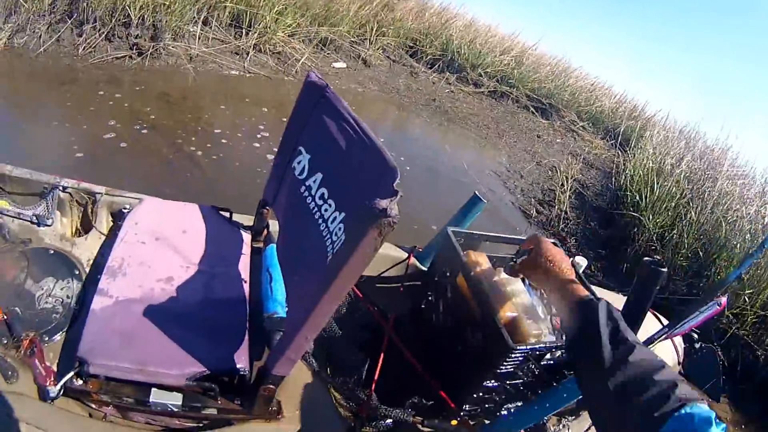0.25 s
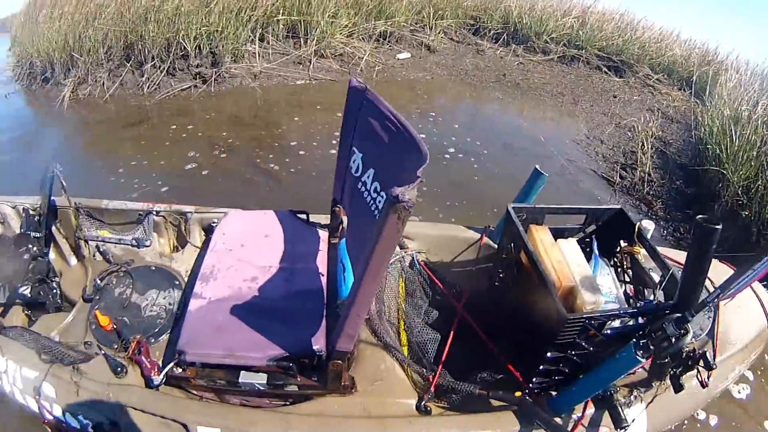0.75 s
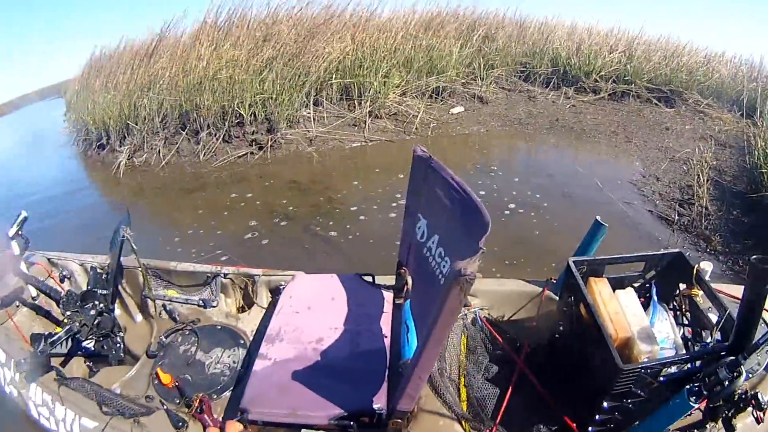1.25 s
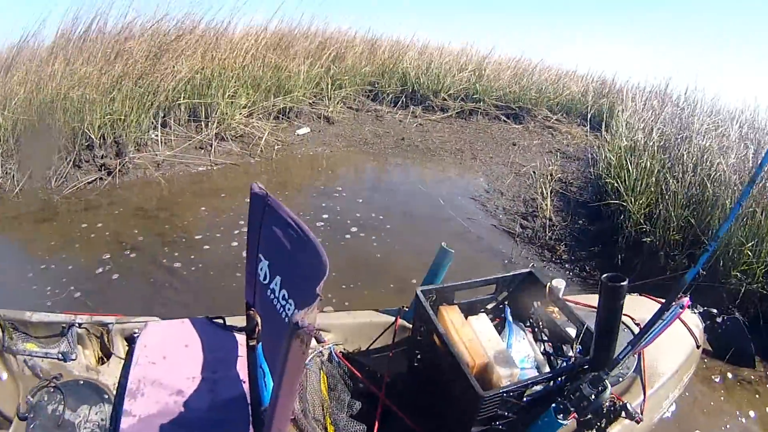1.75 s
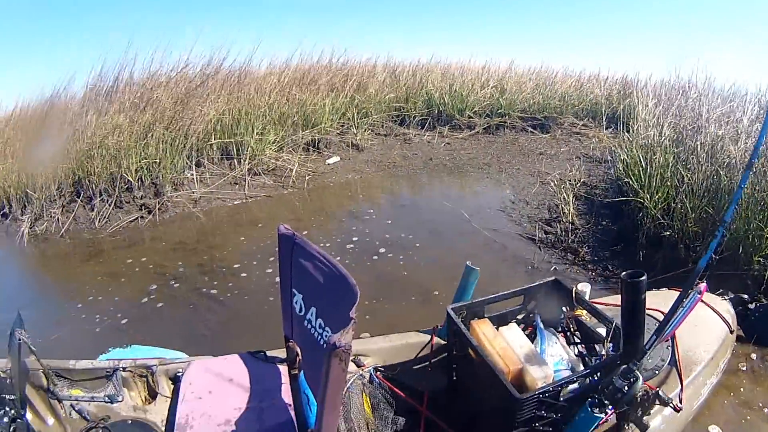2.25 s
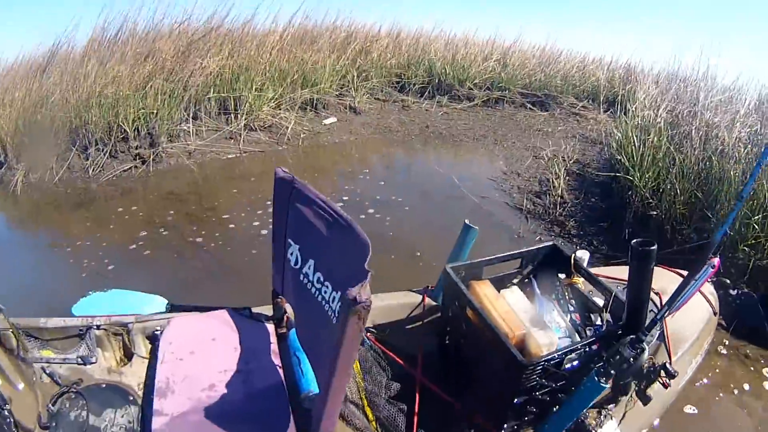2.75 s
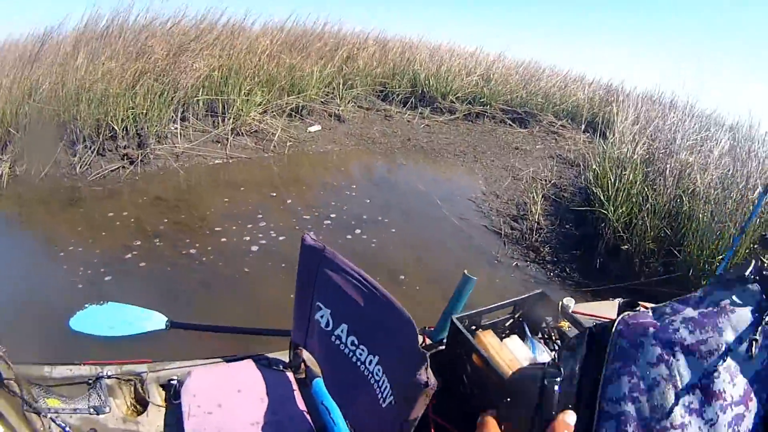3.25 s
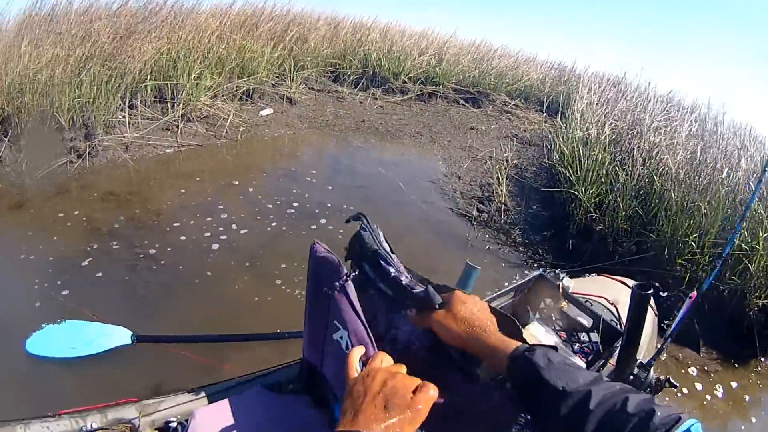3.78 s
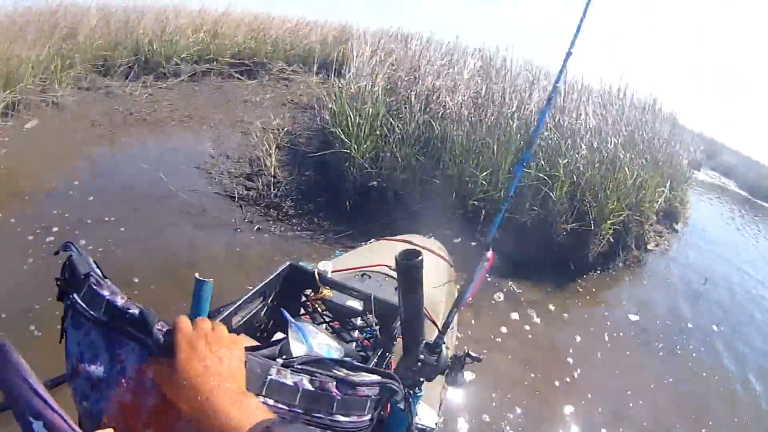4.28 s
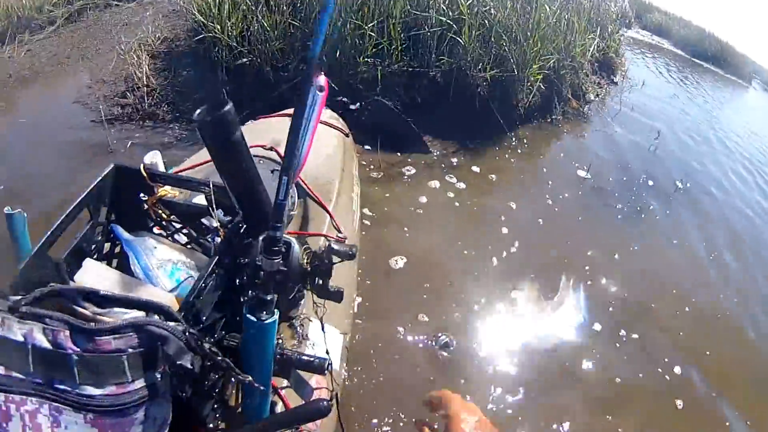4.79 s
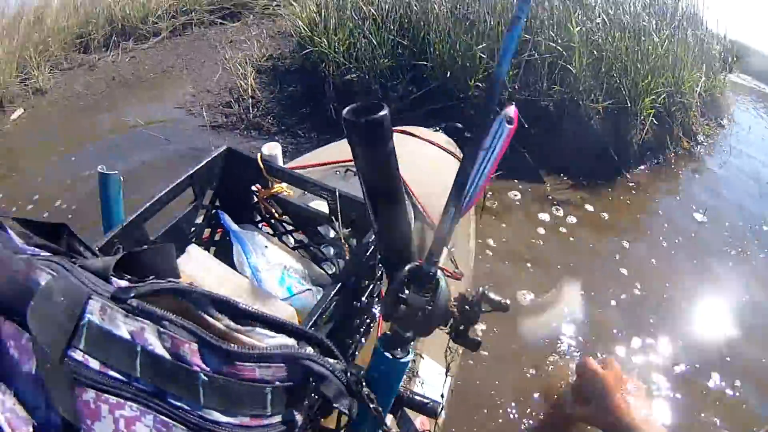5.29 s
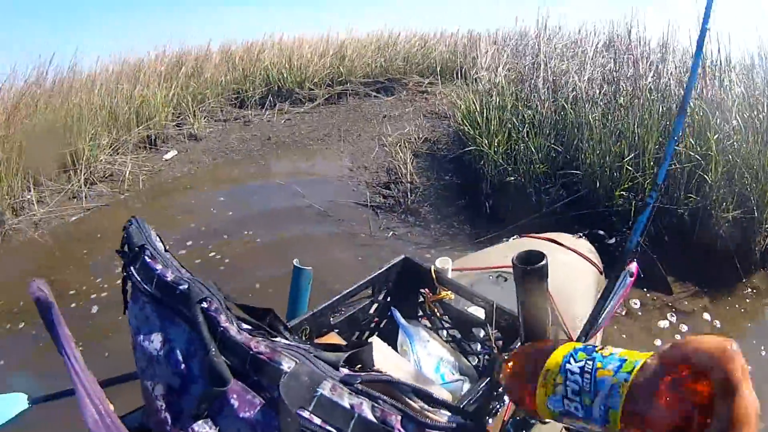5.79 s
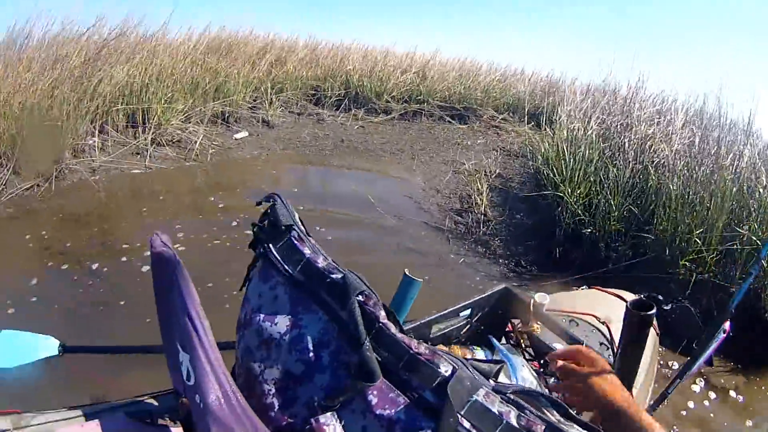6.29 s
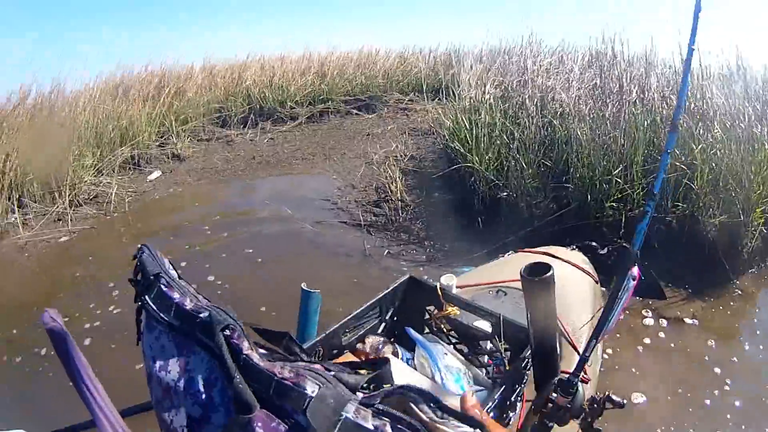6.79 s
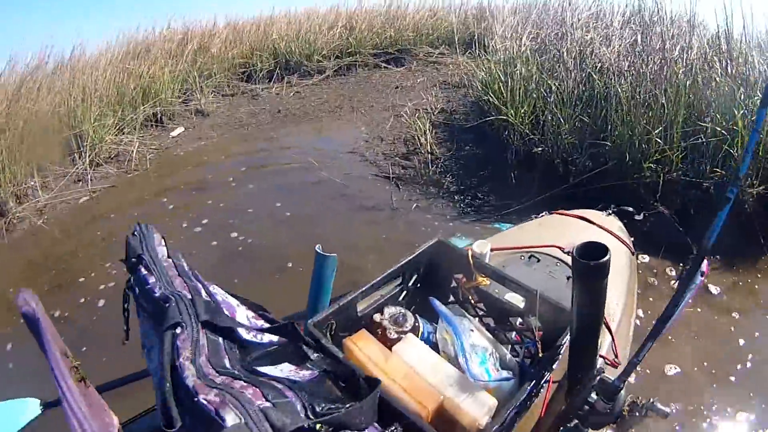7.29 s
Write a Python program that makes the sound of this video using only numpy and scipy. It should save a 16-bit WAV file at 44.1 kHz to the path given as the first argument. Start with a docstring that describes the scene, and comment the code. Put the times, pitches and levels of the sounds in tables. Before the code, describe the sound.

Hollow hull knocks, tackle clatter, nylon bag rubs and small clicks on a kayak in a quiet marsh, with faint water dribbles and low wind buffeting.

```python
"""Gear knocks and thumps on the plastic hull of a kayak at the edge of a marsh creek: damped panel and
hull modes under a low deck boom. A tackle tray rattles as random contacts, hard parts click and chink,
cloth and bag rub as filtered grains, and a seat frame creaks in jerks. Stirred shallow water is made of
gliding bubble tones and spray; filtered noise gives wind buffeting on the microphone and faint air.
A camera housing colours the whole mix."""
import sys
import numpy as np
from scipy import signal
from scipy.fft import rfft, irfft, next_fast_len
from scipy.io import wavfile
from scipy.ndimage import uniform_filter1d

SR = 44100
rng = np.random.default_rng(int(sys.argv[2]) if len(sys.argv) > 2 else 0)


def wav_out(sig):
    """Save sig, one row per channel (or a flat mono array), as 16-bit PCM at SR to the path in sys.argv[1]."""
    wavfile.write(sys.argv[1], SR, np.round(np.clip(np.atleast_2d(sig).T, -1, 1) * 32767).astype(np.int16))


N = 332469
TIME = np.arange(N) / SR
RING = np.arange(SR // 2) / SR  # time axis of a single struck sound

# gusts on the microphone, before the wind trims: crest t/s, half-width/s, level/dB, flutter relative level/dB
GUSTS = [(.52, 0.066, -33, -13), (0.962, 0.14, -35, -4.5), (1.211, 0.041, -44, 7.5),
         (1.42, 0.058, -39.5, 5), (1.75, 0.13, -37.5, -4), (2.29, 0.12, -36.5, 4.5),
         (2.83, 0.087, -33.5, 0.5), (3.3, .27, -33.5, 0), (3.74, 0.066, -32, 0.5), (4.27, 0.094, -39, -9),
         (4.54, 0.15, -42.5, 8.5), (5.105, 0.02, -27, -8), (5.25, 0.043, -39.5, -8),
         (5.43, 0.12, -41.5, 1.5), (6.24, 0.033, -37, 2), (6.65, 0.027, -29, -12), (6.95, 0.07, -37, 0),
         (7.17, 0.043, -36.5, -2), (7.43, 0.091, -32, 4)]
# breeze between the gusts, before the wind trims: t/s, level/dB
BREEZE = [(0, -46.5), (.7, -50.5), (1.1, -45), (2.5, -43.5), (4.0, -44), (4.82, -51), (5.05, -42.5),
          (5.85, -47.5), (6.15, -51.5), (6.5, -44), (7.54, -38.5)]
# spectrum of the wind rumble: f/Hz, level/dB
RUMBLE_COLOUR = [(10, -5), (25, -1), (55, -1), (85, -4), (130, -10), (250, -34.5), (2000, -100)]
# spectrum of the wind flutter: f/Hz, level/dB
FLUTTER_COLOUR = [(60, -1.5), (110, 1.5), (180, -2.5), (280, -11), (420, -26), (900, -43), (2500, -60),
                  (8000, -100)]
RUMBLE_TRIM_DB, FLUTTER_TRIM_DB = 2, -3

# spectrum of the faint marsh hiss: f/Hz, level/dB
AIR_COLOUR = [(150, -16.5), (300, -3), (500, -7), (1500, -12), (4800, -22.5), (7000, -22.5), (13500, -29),
              (15000, -51)]
AIR_DB = -58

# strokes of cloth and bag, before the cloth trims: t/s, length/s, scuff level/dB, hiss level/dB
RUBS = [(0, 0.18, -51, -47), (0.735, 0.11, -53.5, -57), (1.61, 0.29, -59.5, -84),
        (3.408, 0.16, -61.5, -51.5), (3.629, 0.037, -46.5, -50), (3.675, 0.094, -34, -40.5),
        (3.794, .19, -39, -46.5), (3.953, 0.33, -46, -51), (4.331, 0.055, -40.5, -39),
        (4.42, 0.19, -51, -56.5), (4.858, 0.11, -51.5, -72), (4.978, 0.41, -62, -58.5),
        (6.213, 0.22, -47.5, -50.5), (6.393, 0.084, -36.5, -47), (6.494, 0.19, -55, -59),
        (6.977, .1, -48.5, -51), (7.088, 0.06, -41, -61), (7.202, 0.47, -50.5, -59.5)]
# spectrum of the dull scuff: f/Hz, level/dB
SCUFF_COLOUR = [(90, -39), (200, 4.5), (460, 4), (800, -4.5), (1300, -8), (3000, -22), (6000, -80)]
# spectrum of the crisp weave hiss: f/Hz, level/dB
HISS_COLOUR = [(1200, -1), (2200, 8), (4500, 6), (8000, 4), (13800, -1), (15200, -16)]
RUB_ATTACK_S, RUB_RELEASE_T60_S = 0.027, 0.2
# the load nudges the wall as it slides; BUMP_DB is relative to the scuff envelope
BUMPS_PER_S, BUMP_SPREAD_DB, BUMP_HZ, BUMP_DB = 70, 3.5, 545, -6.5

# light chinks of small hard parts: t/s, level/dB, contact length/s
CHINKS = [(0.091, -56, 0.011), (1.431, -36, 0.0023), (3.653, -43.5, 0.0034), (3.846, -49, 0.0022),
          (3.944, -50, 0.0053), (3.962, -49, 0.00068), (4.368, -53, 0.0035), (4.372, -65, 0.023),
          (6.361, -49, 0.0048), (6.4, -24, 0.0019)]
# modes of those parts: f/Hz, level/dB, t60/s
CHINK_MODES = [(4690, -10.5, 0.017), (7220, -13, 0.013), (10760, -28, 0.029)]

# blows on the hull: t/s, level/dB, contact cut-off f/Hz, deck boom level/dB, plastic crack level/dB,
# reference pitch of the struck panel f/Hz
KNOCKS = [(.111, -25, 905, -41, -35.5, 443), (.152, -15.5, 400, -20.5, -35, 261),
          (0.303, -23.5, 347, -26.5, -54, 243), (0.3943, -11, 2860, -16, -18, 189),
          (.801, -34.5, 440, -40, -48, 302), (1.603, -30, 920, -47, -51.5, 220),
          (3.899, -24.5, 1350, -50, -49, 644), (3.964, -8, 1560, -21, -24, 635),
          (3.973, -14.5, 1100, -40, -32, 300), (3.989, -21, 1190, -42, -55, 734),
          (4.153, -5.5, 1000, -27, -58, 503), (4.4107, -16, 775, -45, -45.5, 514),
          (4.885, -34, 540, -42, -46, 400), (4.913, -33.5, 920, -37, -34.5, 386),
          (4.931, -32, 475, -49, -72, 396), (5.544, -29.5, 307, -27.5, -42.5, 298),
          (6.4004, -8.5, 1070, -12.5, -18, 267), (6.467, -31, 600, -38, -56, 300),
          (6.486, -25, 600, -20, -47, 350), (6.581, -13, 1230, -17.5, -27, 276),
          (7.105, -34, 1210, -48, -48, 402)]
# hull and crate modes: f/Hz, level/dB, t60/s
HULL_MODES = [(100, -12, 0.32), (129.3, 10, 0.22), (152.2, -6.5, 0.88), (215, 2.5, 0.05), (251, -0.5, 0.2),
              (303, -39, 0.35), (342, 4, 0.076), (386, -3, 0.062), (408, -35.5, 0.28), (502, -5.5, 0.14),
              (588, 5, 0.063), (668, 5, 0.056), (740, 0, 0.041), (792, -4, 0.16), (920, 1, 0.026),
              (1086, 2.5, 0.087), (1180, 10, 0.037), (1357, 6, 0.065), (1510, -23, 0.27),
              (2100, -12.5, 0.093)]
# struck panel, heavily damped by water and load: multiple of its reference pitch, level/dB, t60/s
PANEL_MODES = [(0.451, 0.5, 0.037), (.72, 4, 0.024), (1.05, 3, 0.026), (1.55, 2.5, 0.011),
               (2.4, -8, 0.0039), (3.8, -28.5, 0.045)]
# modes of the small plastic gear, before any extra damping: f/Hz, level/dB, t60/s
GEAR_MODES = [(1282, -4, 0.05), (1735, -11, 0.02), (1920, 0.5, 0.0087), (2070, -1.5, 0.054),
              (2436, -1, 0.014), (2920, 0, 0.051), (2910, -2.5, 0.062), (3505, -8.5, 0.03),
              (4090, -8, 0.037), (5150, -14, 0.012), (7280, -3.5, 0.012), (10800, -1, 0.04)]

# clicks of buckles and tackle: t/s, level before trim/dB, reference f/Hz, low body relative level before trim/dB
TICKS = [(0.1137, -17.5, 2200, -7), (.302, -27, 1670, -3), (0.617, -36, 1775, 2),
         (.645, -43.5, 2160, -17.5), (1.2102, -35, 1510, 5.5), (1.7514, -21, 2400, -14),
         (1.8697, -29, 1220, -4), (1.9881, -24.5, 2210, -11), (2.7074, -31, 1410, -15),
         (2.842, -21, 1890, -17), (3.0744, -29, 2450, -18), (3.16, -33.5, 2150, -5),
         (3.6382, -29, 1200, 2.5), (3.9134, -21, 2280, -6), (4.0645, -27, 1290, -25),
         (5.244, -29, 4500, -11), (5.278, -32, 1390, -10), (5.5669, -22, 2800, -16),
         (6.246, -19, 2270, -12), (6.468, -25.5, 2000, 0.5), (6.631, -26, 2200, -4),
         (6.656, -28.5, 1800, -21), (6.984, -18.5, 1400, -24), (7.0848, -22, 2130, -7.5),
         (7.107, -27, 1900, -8), (7.5303, -17.5, 4830, -7.5)]
TICK_T60_S = 0.023

# tackle shaking in the tray: t/s, level/dB, length/s, fade t60/s
RATTLES = [(.14, -23, 0.027, 0.083), (0.161, -16, 0.0074, 0.054), (0.192, -35.5, 0.012, 0.49),
           (0.304, -41, 0.049, 0.16), (0.371, -22, 0.015, 0.15), (0.388, -24, 0.032, 0.18),
           (0.457, -40, 0.012, 0.72), (0.527, -31, 0.01, 0.051), (0.565, -43, .003, 0.053),
           (4.137, -34, 0.013, 0.055), (6.958, -33.5, 0.0039, 0.27), (7.104, -40.5, 0.0073, 0.38),
           (7.195, -57, 0.041, 0.13)]
# spectrum of the direct rattle contacts: f/Hz, level/dB
RATTLE_COLOUR = [(140, -0.5), (280, 4.5), (400, -3.5), (600, -3.5), (1000, -4.5), (1800, -5), (2600, -11),
                 (4500, -16.5), (6200, -20.5), (10000, -15.5), (12000, -36), (13800, -15), (15500, -32)]

# largest plops and drips: t/s, peak level/dB, base pitch f/Hz, pitch glide over the ring/octaves,
# splash relative level before trim/dB
PLOPS = [(1.16, -33, 700, 0.63, -0.5), (1.19, -32.5, 603, .2, 2), (1.2, -30.5, 500, -0.085, 3),
         (2.622, -34, 732, 1.3, 9), (2.716, -34, 348, -1.15, 4), (2.733, -42, 1110, .8, -8),
         (2.741, -28, 1610, 1.2, -6.5), (2.777, -36, 1270, -0.29, -12), (2.896, -40, 1640, .3, 0),
         (2.928, -36, 2000, 0.48, 0), (3.27, -41, 1610, -0.13, -14), (3.435, -39.5, 507, 1.5, 9.5),
         (4.737, -41, 1110, -0.5, 2), (5.225, -41, 430, .1, -5), (5.321, -42.5, 4200, 0.073, 11),
         (5.35, -31.5, 650, 0.43, 3.5), (5.354, -33, 1156, -0.33, -36), (5.478, -39.5, 720, 1.6, -2),
         (5.758, -41, 2330, -0.38, 10.5), (5.791, -48.5, 3080, 0.53, 12), (5.919, -42.5, 3070, 0.042, 12),
         (5.94, -40.5, 1290, 0.076, -14)]
PLOP_T60_S, PLOP_SIZE_LAW = 0.0417, 0.3  # ring of a 1 kHz bubble; it shortens as this power of the pitch
PLOP_WOBBLE = 0.12  # random pitch deviation as a share of the pitch
# stirring of the shallow water: t/s, length/s, level/dB
STIRS = [(2.565, 0.39, -53), (2.962, 0.93, -57.5), (4.632, 0.086, -57), (5.22, 0.39, -56.5),
         (5.62, 0.26, -61)]
STIR_ATTACK_S, STIR_SETTLE_T60_S = 0.046, 0.38
BUBBLES_PER_S, BUBBLE_LOW_HZ, BUBBLE_OCTAVES, BUBBLE_SPREAD_DB = 220, 650, 3.2, 16
BUBBLE_LIFE = 0.7  # share of its ring time that a small bubble lasts before it bursts
BUBBLE_DB, PATTER_DB, SPRAY_DB = -4, -3.5, -3  # balance inside the stirred water
# spectrum of the spray: f/Hz, level/dB
SPRAY_COLOUR = [(200, -23), (500, 1), (1500, -2.0), (3000, -17.5), (8000, -14.5), (14000, -17), (15500, -43)]

# slips of the seat frame under a hand: t/s, level/dB
CREAKS = [(1.3433, -29), (1.356, -34), (1.365, -36), (1.376, -36.5), (1.387, -31), (1.4177, -32.5),
          (1.43, -37), (1.4349, -31.5)]
# seat frame modes, before each slip detunes them: f/Hz, level/dB, t60/s
SEAT_MODES = [(307, 3.5, 0.037), (757, -1, 0.042), (1140, 4.5, 0.01), (1780, 0, 0.025), (2700, 2, 0.014),
              (2990, 2.5, 0.008), (5150, -6, 0.012), (6900, -6, 0.01), (9250, -4.5, 0.015)]

# response of the camera housing: f/Hz, level/dB
HOUSING = [(3800, 0.5), (4800, 2.5), (5400, -1), (5800, -11), (6250, -10), (6700, -1), (7250, 0.5),
           (8200, -2), (14500, -3)]
TOP_HZ = 15600


def undb(db):
    """Decibels to gain."""
    return 10 ** (np.asarray(db) / 20)


def unit(x):
    """Scale to rms 1."""
    return x / np.sqrt(np.mean(x ** 2))


def peak(x, db):
    """Scale to a peak level."""
    return x * undb(db) / np.abs(x).max()


def strike(x, db):
    """Scale a blow so that its loudest 3 ms have the given rms level."""
    return x * undb(db) / np.sqrt(uniform_filter1d(x ** 2, size=132).max())


def fade(t60):
    """Exponential decay by 60 dB in t60 seconds."""
    return np.exp(-np.log(1000) * RING / t60)


def swell(attack_s):
    """A contact that builds up instead of starting at once."""
    return 1 - np.exp(-RING / attack_s)


def stroke(s, length, attack_s, release_t60):
    """Envelope of a movement: it builds up, holds and dies away."""
    age = TIME - s
    build = np.clip(age / attack_s, 0, 1)
    return build * np.exp(-np.log(1000) * np.maximum(age - length, 0) / release_t60)


def add(track, s, sound):
    """Mix a sound in at time s."""
    i = int(s * SR)
    track[i:i + len(sound)] += sound[:N - i]


def cut(x, hz, kind, order=2):
    """Causal low-pass or band-pass."""
    return signal.sosfilt(signal.butter(order, hz, kind, fs=SR, output="sos"), x)


def colour(x, points):
    """Shape a spectrum through (Hz, dB) points, joined along log frequency."""
    hz, db = np.transpose(points)
    size = next_fast_len(len(x))
    f = np.arange(size // 2 + 1) * SR / size + 1  # 1 Hz up, to keep the log finite
    gain = undb(np.interp(np.log(f), np.log(hz), db))
    return irfft(rfft(x, size) * gain, size)[:len(x)]


def walk(rate):
    """Slow random drift with rms 1, heading for a new value rate times a second."""
    k = int(SR / rate)
    steps = np.repeat(rng.standard_normal(N // k + 1), k)
    return unit(uniform_filter1d(steps, k)[:N])


def grains(rate, spread_db, size):
    """Random tiny contacts of uneven strength, about rate a second."""
    present = rng.random(size) < rate / SR
    strength_db = spread_db * np.minimum(rng.exponential(size=size), 4)
    return present * rng.choice([-1, 1], size) * undb(strength_db)


def ring(modes):
    """Struck modes as decaying sines; neighbours swing in opposite directions."""
    out = np.zeros(len(RING))
    for k, (hz, db, t60) in enumerate(modes):
        out += (-1) ** k * undb(db) * fade(t60) * np.sin(2 * np.pi * hz * RING)
    return out


def panel(pitch_hz):
    """A dented panel rings heavily damped modes at fixed multiples of its reference pitch."""
    return ring([(multiple * pitch_hz, db, t60) for multiple, db, t60 in PANEL_MODES])


def burst(t60):
    """A dying puff of noise stands for dense vibration."""
    return rng.standard_normal(len(RING)) * fade(t60)


def breeze():
    """Large eddies rumble on the microphone; gusts add a quick flutter."""
    steady = undb(np.interp(TIME, *np.transpose(BREEZE)))
    gusts = np.array([undb(db) * np.exp(-((TIME - s) / width) ** 2) for s, width, db, _ in GUSTS])
    wind = np.sqrt(steady ** 2 + np.sum(gusts ** 2, axis=0))  # powers add
    flutter_power = undb(np.array(GUSTS)[:, 3]) ** 2
    turbulence = np.sqrt((undb(-4) * steady) ** 2 + flutter_power @ gusts ** 2)
    rumble = unit(colour(rng.standard_normal(N), RUMBLE_COLOUR)) * wind
    flutter = unit(colour(rng.standard_normal(N), FLUTTER_COLOUR)) * turbulence * undb(2.8 * walk(30))
    return undb(RUMBLE_TRIM_DB) * rumble + undb(FLUTTER_TRIM_DB) * flutter


def marsh_air():
    """Steady coloured noise makes the faint hiss of the marsh."""
    return undb(AIR_DB) * unit(colour(rng.standard_normal(N), AIR_COLOUR))


def bumps():
    """Soft random nudges of sliding gear ring a plastic wall."""
    nudges = grains(BUMPS_PER_S, BUMP_SPREAD_DB, N)
    return unit(signal.fftconvolve(nudges, panel(BUMP_HZ))[:N])


def cloth():
    """Nylon catches and slips: a dull scuff from the bag, a crisp hiss from the weave, soft bumps below."""
    slip = unit(undb(3.33 * walk(60)))
    strokes = np.array([stroke(s, length, RUB_ATTACK_S, RUB_RELEASE_T60_S) for s, length, _, _ in RUBS])
    scuff_gain, hiss_gain = undb(np.array(RUBS)[:, 2:]).T @ strokes
    scuff = unit(colour(grains(2500, 0.48, N), SCUFF_COLOUR)) * scuff_gain
    hiss = unit(colour(grains(3000, 3.1, N), HISS_COLOUR)) * hiss_gain
    rubbing = slip * (undb(2) * scuff + undb(-5.5) * hiss)
    return rubbing + undb(BUMP_DB) * scuff_gain * bumps()


def chinks():
    """A brief grazing contact, a scrap of noise, rings a small hard part."""
    out = np.zeros(N)
    for s, db, length in CHINKS:
        graze = rng.standard_normal(int(length * SR) + 2)
        add(out, s, strike(signal.fftconvolve(graze, ring(CHINK_MODES)), db))
    return out


def crack(t60):
    """Hard plastic contact: a snap, the ring of the gear and a faint buzz after it."""
    gear = ring(GEAR_MODES) * fade(6 * t60)
    return burst(t60) + undb(-9.0) * gear + undb(-22.5) * burst(0.14)


def knocks():
    """Each blow dents a panel, rings the hull and sets the deck booming; soft contacts lose the highs."""
    out, hull = np.zeros(N), ring(HULL_MODES)
    deck = fade(0.23) * np.sin(2 * np.pi * 63 * RING)
    for s, db, contact_hz, boom_db, crack_db, panel_hz in KNOCKS:
        # noise stands for countless weaker modes that make the wall shudder, the low ones longest
        shudder = cut(burst(0.05), [300, 2200], "band") + undb(-3) * cut(burst(0.28), [90, 520], "band")
        body = hull + undb(19.5) * panel(panel_hz) + undb(25) * shudder
        body = cut(body, contact_hz, "low", order=3)
        plastic = cut(crack(0.024), [1100, 9000], "band", order=1)
        add(out, s, strike(body, db) + strike(deck, boom_db) + strike(plastic, crack_db))
    return out


def ticks():
    """Small hard clicks, each with a little knock from what the part is fixed to."""
    out = np.zeros(N)
    for s, db, hz, body_db in TICKS:
        click = cut(crack(TICK_T60_S), [hz / 3.6, hz * 2], "band", order=1)
        body = cut(burst(0.073), [180, 1200], "band")
        add(out, s, strike(click, db - 14.0))
        add(out, s, strike(body, db + body_db - 9.5))
    return out


def tray():
    """Lures and hooks chatter as random contacts that also ring the gear, while the tray is shaken."""
    shake = np.zeros(N)
    for s, db, length, t60 in RATTLES:
        hold = np.ones(int(length * SR))
        add(shake, s, undb(db) * np.concatenate([hold, fade(t60)]))
    # the load catches and lets go, so contacts come in loud and soft clumps
    contacts = grains(3500, 3.4, N) * undb(2.55 * walk(150))
    ringing = signal.fftconvolve(contacts, ring(GEAR_MODES))[:N]
    return shake * unit(unit(colour(contacts, RATTLE_COLOUR)) + undb(-17) * unit(ringing))


def bubble(hz, t60, glide, wobble=0.069):
    """An air pocket rings and dies by 60 dB while its pitch wobbles and glides by some octaves."""
    t = RING[:int(t60 * SR)]
    age = t / t[-1]
    shape = np.interp(age, np.linspace(0, 1, 20), rng.standard_normal(20))
    pitch = hz * 2 ** (glide * age) * (1 + wobble * shape)
    onset = 1 - np.exp(-t * hz / 2)
    return np.sin(2 * np.pi * np.cumsum(pitch) / SR) * np.exp(-np.log(1000) * age) * onset


def ring_time(hz):
    """Small, high bubbles die sooner than large ones."""
    return PLOP_T60_S / (hz / 1000) ** PLOP_SIZE_LAW


def trickle():
    """Small bubbles of random size chirp at random moments."""
    out = np.zeros(N)
    for when, smallness, size, rise in rng.random((int(BUBBLES_PER_S * N / SR), 4)):
        hz = BUBBLE_LOW_HZ * 2 ** (BUBBLE_OCTAVES * smallness)
        gain = undb(BUBBLE_SPREAD_DB * size - 3.6 * smallness)
        add(out, when * N / SR, gain * bubble(hz, BUBBLE_LIFE * ring_time(hz), 0.22 * rise))
    return unit(out)


def droplets(count=5000):
    """Droplets patter at random moments, each a tone so short that it ticks rather than rings."""
    out = np.zeros(N)
    for when, smallness, size, rise in rng.random((count, 4)):
        hz = 700 * 14 ** smallness
        t60 = 10 / hz + 1 / 500
        gain = undb(20 * size ** 3 - 2.5 * smallness)
        add(out, when * N / SR, gain * bubble(hz, t60, 0.5 * rise))
    return unit(out)


def plops():
    """Each large air pocket rings, with a soft splash of noise around its pitch."""
    out = np.zeros(N)
    for s, db, hz, glide, splash_db in PLOPS:
        add(out, s, peak(bubble(hz, ring_time(hz), glide, wobble=PLOP_WOBBLE), db))
        # a soft splash of noise begins 3 ms before the bubble tone
        splash = cut(burst(0.034) * swell(0.002), [hz * 0.5, hz * 3.0], "band", order=1)
        add(out, s - 0.003, strike(splash, db + splash_db - 15.0))
    return out


def water():
    """Distinct plops over small bubbles, droplets and spray that follow the stirring."""
    spray = unit(colour(grains(1200, 0.87, N), SPRAY_COLOUR))
    stirring = np.zeros(N)
    for s, length, db in STIRS:
        stirring += undb(db) * stroke(s, length, STIR_ATTACK_S, STIR_SETTLE_T60_S)
    drops = undb(PATTER_DB) * droplets() + undb(SPRAY_DB) * spray
    return plops() + stirring * undb(2.9 * walk(40)) * (drops + undb(BUBBLE_DB) * trickle())


def seat():
    """Every slip of the frame snaps and rings its short modes, each time a little differently."""
    out = np.zeros(N)
    for s, db in CREAKS:
        modes = np.array(SEAT_MODES)
        modes[:, 0] *= 1 + 0.08 * rng.standard_normal(len(modes))
        add(out, s, strike(ring(modes) + undb(-5.0) * burst(0.034), db))
    return out


def scene():
    """Gear, water and wind over the faint hiss of the marsh."""
    weather = breeze() + marsh_air()
    gear = cloth() + chinks() + knocks() + ticks() + tray() + seat()
    return (weather + gear + water())[None]


def record(dry):
    """The housing hollows the treble, a thin sizzle follows the 200-900 Hz sound, and the top is cut."""
    x = dry[0]
    high_noise = unit(cut(rng.standard_normal(N), [11500, 12600], "band", order=3))
    sizzle = cut(x, [200, 900], "band") * high_noise
    x = np.clip(colour(x, HOUSING) + undb(-24.5) * sizzle, -1, 1)
    # steep low-pass: 0.2 dB ripple, 70 dB stop band
    return signal.sosfilt(signal.ellip(8, 0.2, 70, TOP_HZ, fs=SR, output="sos"), x)[None]


dry = scene()
out = record(dry)
wav_out(out)
```